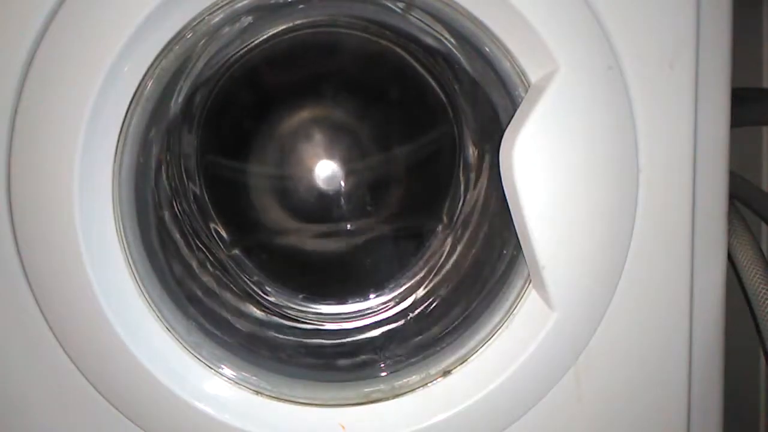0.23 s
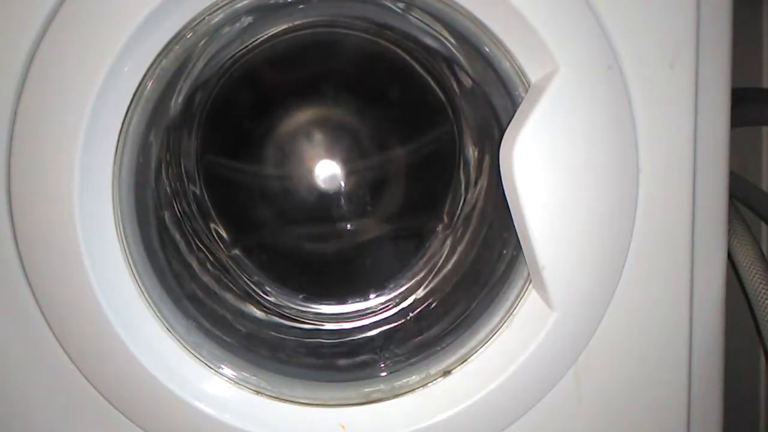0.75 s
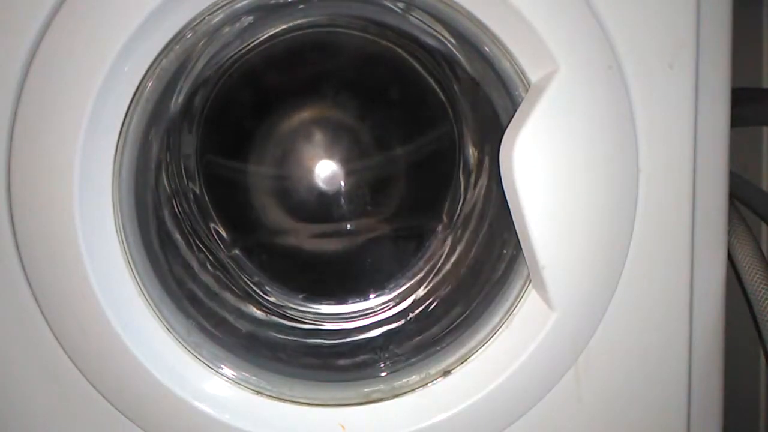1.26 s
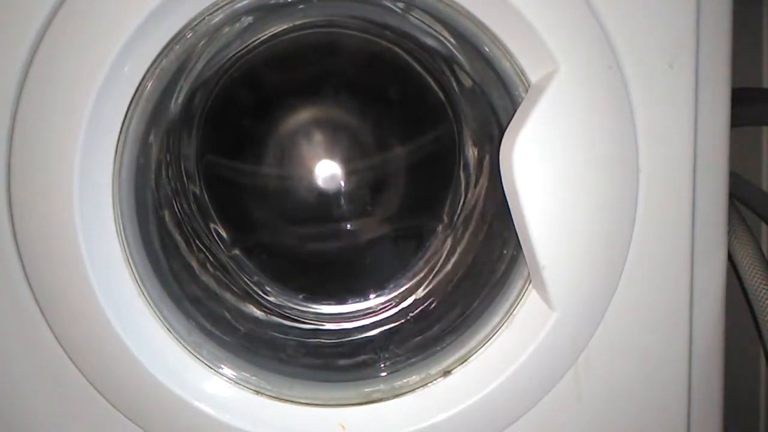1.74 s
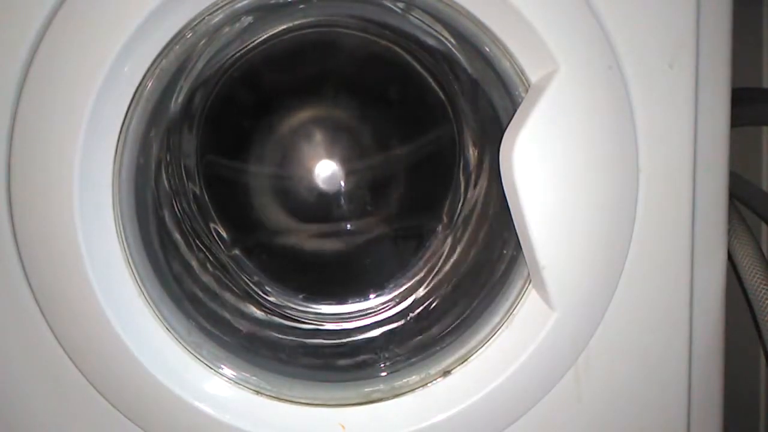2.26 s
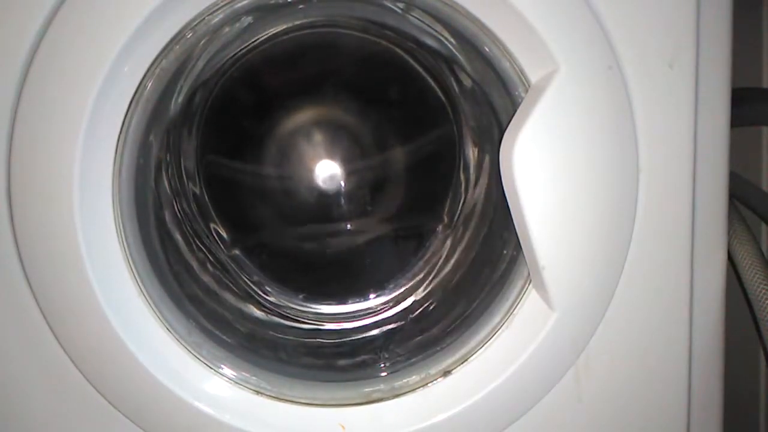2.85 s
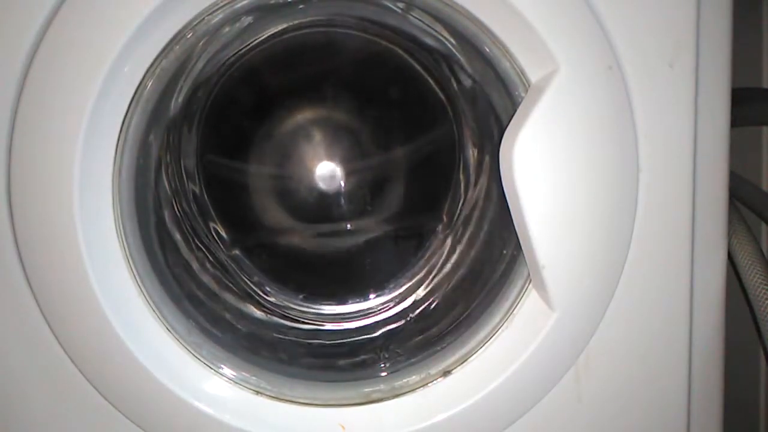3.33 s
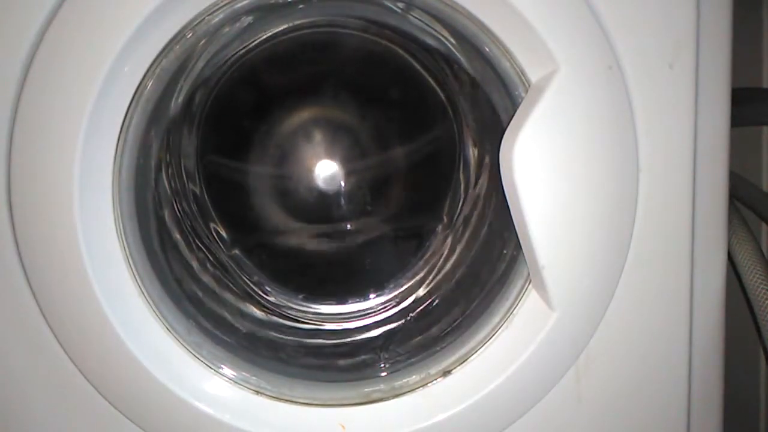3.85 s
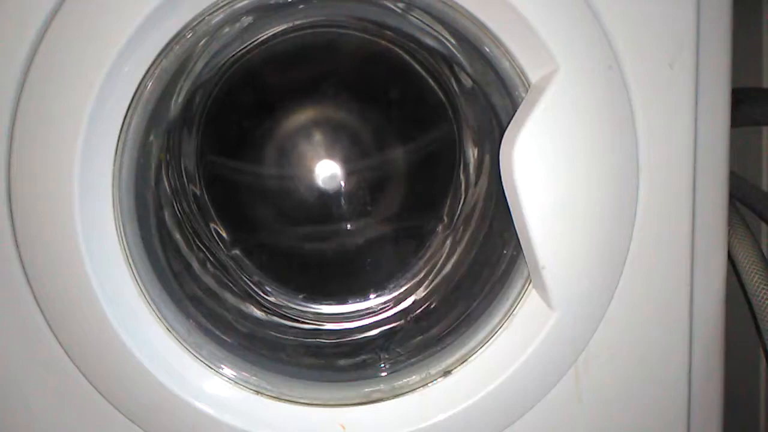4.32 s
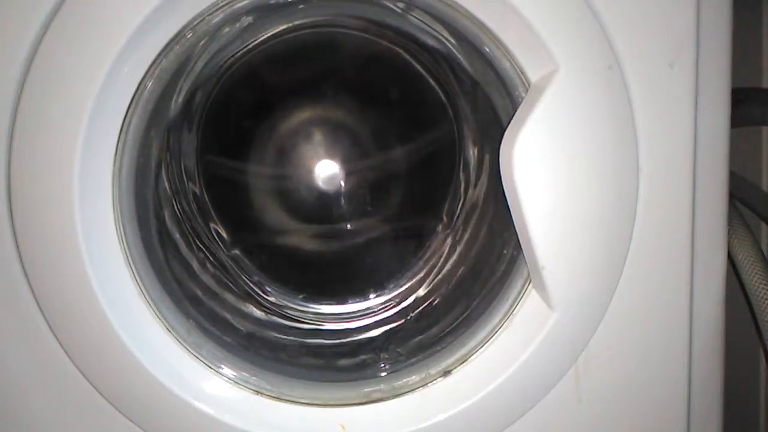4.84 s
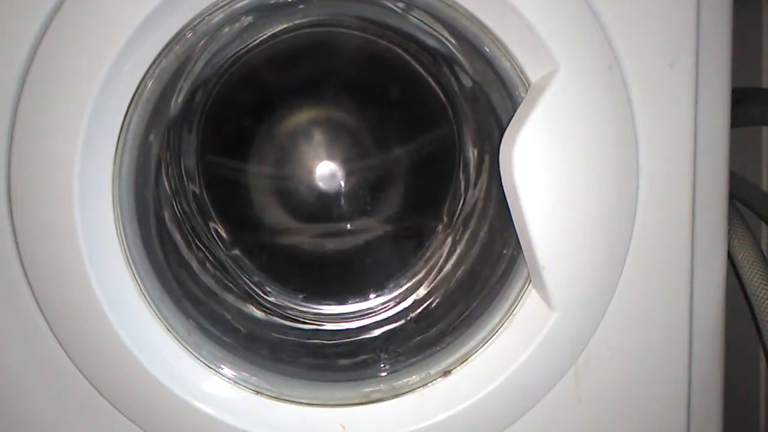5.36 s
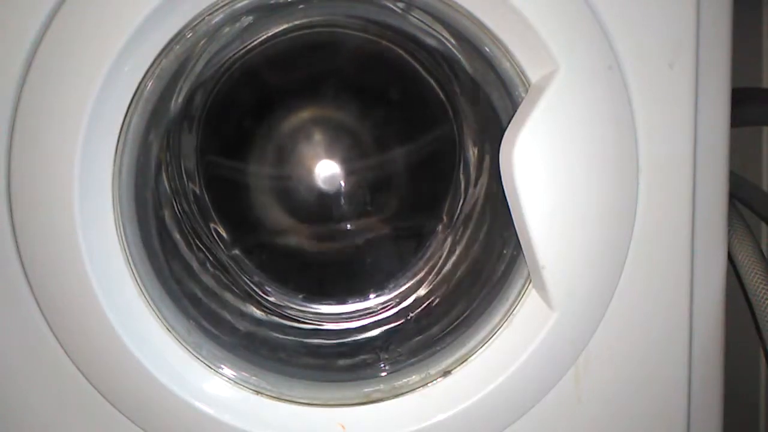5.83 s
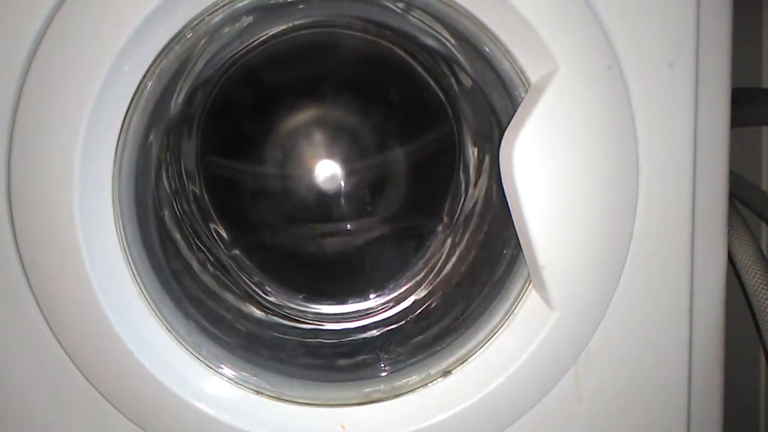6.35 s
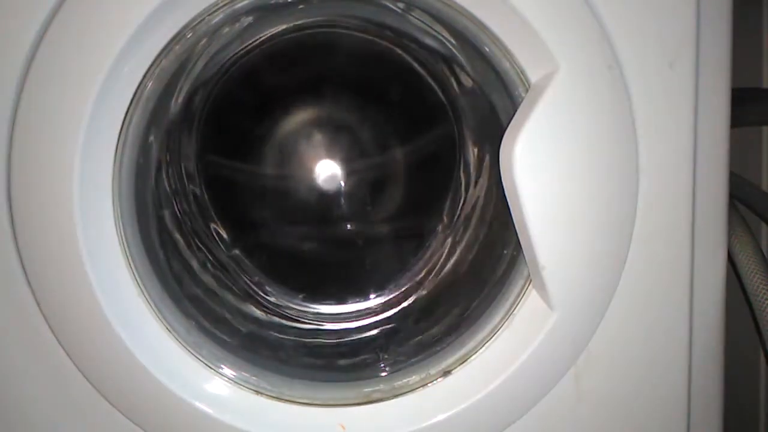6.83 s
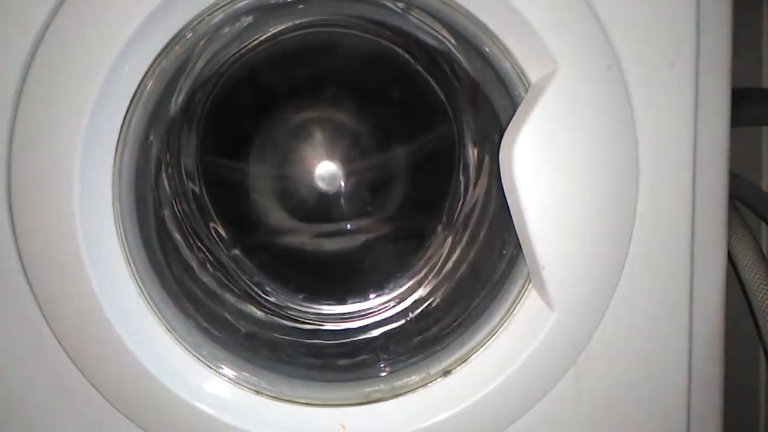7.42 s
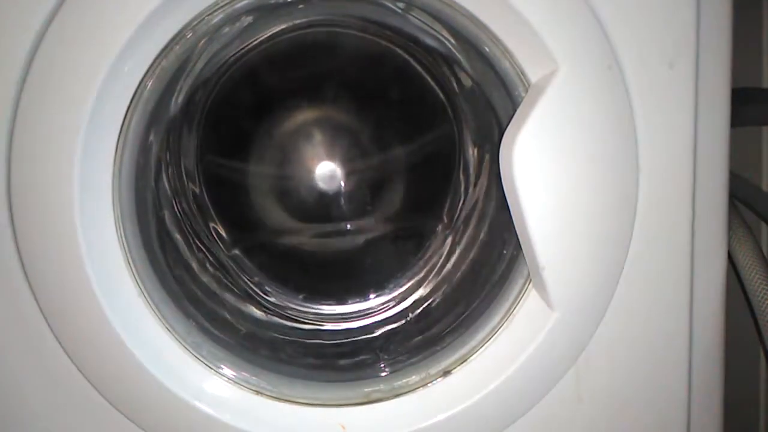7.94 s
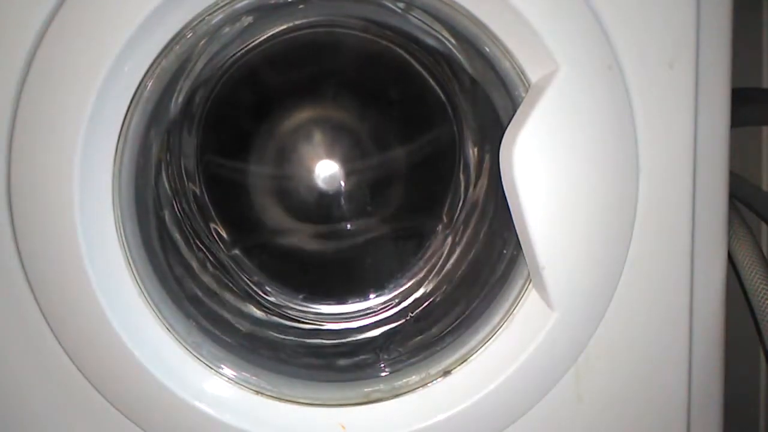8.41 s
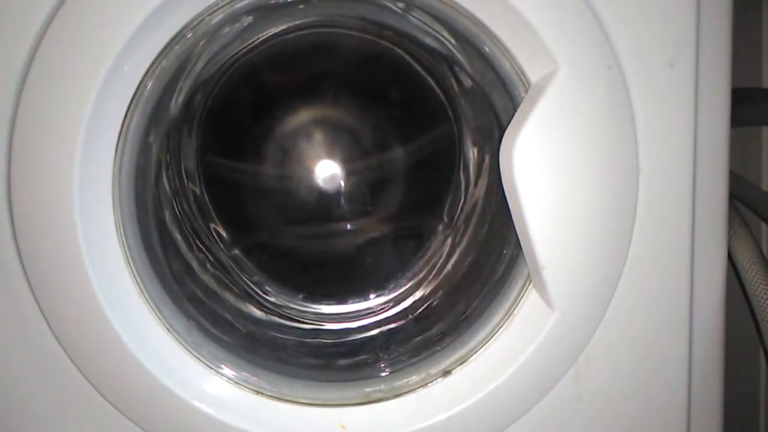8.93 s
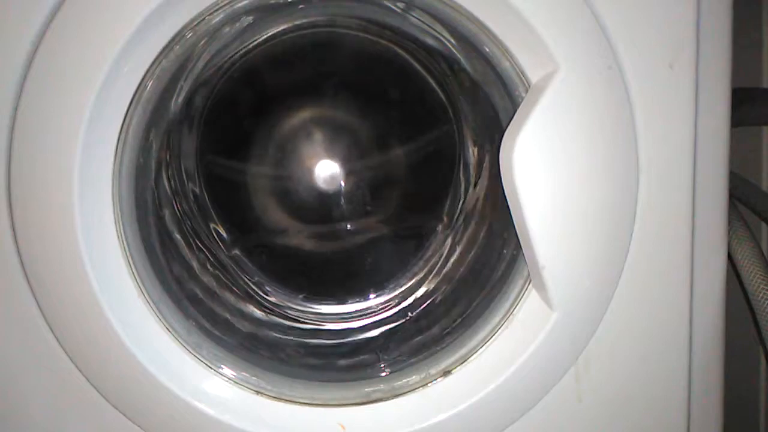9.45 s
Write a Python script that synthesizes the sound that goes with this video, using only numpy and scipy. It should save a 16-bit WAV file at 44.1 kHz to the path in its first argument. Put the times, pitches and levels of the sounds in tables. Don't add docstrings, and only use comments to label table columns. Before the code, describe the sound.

From 0 seconds a front-loading washing machine is already spinning at high, practically constant speed in a small room, heard close in stereo. Very deep sound dominates: the unbalanced drum throbs roughly sixteen times a second, and its sprung tub sways with irregular, muffled lurches, two or three each second, pressing the sound slightly. Over this lies a steady low motor hum near 185 hertz with mains buzz, hollow metal-panel rumble and a soft fan rush. Much fainter, a thin high whine and dry, sizzling brush hiss flutter with the drum. They chatter roughly from 0 to about 4 seconds, strongest around 2.4 and 3.6, then become firmer and smoother, weakest near 5.7, with hiss rising again by 8.4 and roughness returning towards the end. At about 8.9 seconds a small hard double tick touches the glass door, barely above the rumble. The spin continues to an abrupt end near 9.7 seconds.

```python
import sys
import numpy as np
from scipy import signal
from scipy.fft import rfft, irfft, next_fast_len
from scipy.io import wavfile
from scipy.ndimage import uniform_filter1d, minimum_filter1d, map_coordinates

SR = 44100
rng = np.random.default_rng(int(sys.argv[2]) if len(sys.argv) > 2 else 0)


def makeup_ratio(level_db):
    decades = np.asarray(level_db, float) / 20
    return 10 ** decades


def pcm_store(signal):
    levels = np.round(np.clip(np.atleast_2d(signal), -1, 1) * 32767)
    wavfile.write(sys.argv[1], SR, levels.astype(np.int16).T)


N = 426888
BELT_RATIO = 11.682


def unit(x):
    return x / np.sqrt(np.mean(x ** 2) + 1e-20)


def mid_unit(pair):
    return pair / np.std(pair.mean(0))


def along(points, hz):
    f, *columns = np.transpose(points)
    return np.array([np.interp(np.log(hz + 1), np.log(f + 1), column) for column in columns])


def curves(rows):
    s, *columns = np.transpose(rows)
    return np.array([np.interp(np.arange(N) / SR, s, column) for column in columns])


def wobble(rate):
    knots = rng.standard_normal(int(N * rate / SR) + 4)
    return unit(map_coordinates(knots, [np.arange(N) * rate / SR]))


def tone(angle, left_db, right_db, lead):
    angle = angle + rng.uniform(0, 2 * np.pi)
    s, c = np.sin(angle), np.cos(angle)
    left = makeup_ratio(left_db) * (s * np.cos(lead) + c * np.sin(lead))
    return np.sqrt(2) * np.array([left, makeup_ratio(right_db) * s])


# [t/s, turns per s]
SHAFT_SPEED = [(0, 185.285), (.4, 185.293), (1.3, 185.36), (2.3, 185.44), (2.8, 185.44), (3.3, 185.4),
               (4.3, 185.29), (5.8, 185.12), (6.3, 185.13), (8, 185.22), (9.68, 185.23)]
# [f/Hz, likeness 0-1]
LIKENESS = [(30, .999), (70, .985), (140, .99), (330, .95), (470, .7), (800, .6), (1000, .15), (1550, .35),
            (2200, .08), (14000, .04)]
# [f/Hz, left lead/rad]
LEFT_LEAD = [(30, 0), (150, 0), (255, .25), (335, .85), (420, 0), (630, .3), (800, .2), (1000, -2.2),
             (1550, -3.3), (1900, -4.5)]
# [f/Hz, width/Hz, left level/dB, right level/dB]
RESONANCES = [(68, 2.2, -2, -1), (76, 5, -12, -8.5), (243, 8.2, 4, 4.5), (337.5, 8.8, 2.5, 2.5),
              (422, 14.4, 3.5, 3.5), (491, 11.4, 4, 7.5), (602.5, 9, 8.5, 2), (653, 20, 3.5, 1.5),
              (808, 22, -3, 2), (870, 15, 0, 4), (920, 16, 6, 8.5), (1011, 11.4, 6, 6.5),
              (1160, 36, 0.5, 5.5), (1316, 9.1, -4, -10), (1395, 10, -6, -6), (1520, 13, -1, 7.5),
              (1666, 16, 9.5, 2.5), (1880, 16, 8, -2.5), (2645, 13, -2, 10), (3950, 35, 2, 6.5)]


def noise(colour, repeat=0.):
    m = next_fast_len(N)
    hz = np.fft.rfftfreq(m, 1 / SR)
    a, b = rfft(rng.standard_normal((2, m)))
    spread = np.arccos(np.clip(along(LIKENESS, hz)[0], -1, 1)) / 2
    left = (a * np.cos(spread) + b * np.sin(spread)) * np.exp(1j * along(LEFT_LEAD, hz)[0])
    right = a * np.cos(spread) - b * np.sin(spread)
    db = along(colour, hz)
    for centre, width, *lift in RESONANCES:
        near = slice(*np.searchsorted(hz, [centre - 4 * width, centre + 4 * width]))
        db[:, near] += np.outer(lift, np.exp(-((hz[near] - centre) / width) ** 2))
    repeat = np.clip(repeat * np.minimum(hz / 6000, 1) ** 3, 0, .6)
    turns_per_s = np.mean(SHAFT_SPEED, axis=0)[1]
    comb = np.sqrt(1 - repeat ** 2) / (1 - repeat * np.exp(-2j * np.pi * hz / turns_per_s))
    return irfft(np.array([left, right]) * makeup_ratio(db) * comb * np.sqrt(SR / 2), m)[:, :N]


# [t/s, level/dB]
BRUSH_CURRENT = [(0.0, -57.5), (0.24, -56), (0.86, -54.5), (0.94, -58.5), (1.08, -55.5), (2.05, -54.5),
                 (2.08, -57), (2.69, -55.5), (2.88, -60.5), (3.5, -56), (4.53, -57.5), (4.72, -54),
                 (5.72, -63.5), (6.61, -59.5), (8.38, -54), (9.33, -55), (9.6, -58), (9.68, -55)]


def driven(rules):
    fast_hz, fast_span_hz, flicker_db = 185.298, .013, .7
    current_db = curves(BRUSH_CURRENT)[0]
    swing_db = current_db - current_db.mean()
    fast = 1 / (1 + np.exp((fast_hz - curves(SHAFT_SPEED)[0]) / fast_span_hz))
    return [db + follows * swing_db + fast_db * fast + flicker_db * wobble(4)
            for db, follows, fast_db in rules]


# [f/Hz, left level/dB per Hz, right level/dB per Hz]
WALLS = [(29.8, -67, -76), (55, -42, -46.5), (88.6, -45.5, -42.5), (98, -51.5, -50.5), (155, -48.5, -46.5),
         (168, -54, -52.5), (230, -56, -54), (282, -53.5, -52.5), (309.5, -72, -55), (328.5, -51.5, -53),
         (348, -60, -57.5), (444, -62, -66.5), (501, -67, -70), (630, -100, -100)]
# [f/Hz, left level/dB per Hz, right level/dB per Hz]
PANEL_BOOM = [(406, -100, -100), (526, -73, -62.5), (590, -62.5, -70.5), (700, -68, -64), (789, -59, -64.5),
              (910, -74, -77.5), (960, -73, -71.5), (1130, -74, -71.5), (1370, -70, -72), (1485, -82, -79),
              (1790, -82.5, -85.5), (1990, -83.5, -79), (2130, -81, -85), (2280, -110, -110)]
# [f/Hz, left level/dB per Hz, right level/dB per Hz]
FAN_RUSH = [(1980, -111, -111), (2170, -89.5, -82.5), (2650, -85.5, -81.5), (3030, -89.4, -88),
            (3170, -87.5, -84.5), (3600, -88, -88.5), (4265, -88, -80.5), (4210, -94, -87),
            (5000, -94.5, -94.5), (5700, -94.5, -99), (6420, -96, -100.5), (6610, -89, -89),
            (7120, -99.5, -99.5), (8260, -131, -131)]
# [mean level/dB, dB per dB of current, extra level/dB at high speed]
FAN_DRIVE = [(0, .3, 0)]


def cabinet():
    walls = noise(WALLS)
    panels = makeup_ratio(0.34 * wobble(2.24)) * noise(PANEL_BOOM)
    fan = makeup_ratio(driven(FAN_DRIVE)[0] + .4 * wobble(8)) * noise(FAN_RUSH, repeat=0.4)
    return walls + panels + fan


# [t/s, peak level/dB, f/Hz]
DOOR_TAPS = [
    (8.887, -41, 4450),
    (8.893, -48, 5500),
    (8.915, -50, 4200),
]


def tick():
    out = np.zeros((2, N))
    t = np.arange(SR // 10) / SR
    for s, db, hz in DOOR_TAPS:
        rough = uniform_filter1d(rng.standard_normal((2, len(t))), size=70) * 8
        envelope = makeup_ratio(db - 60 * t / .15) * (1 - np.exp(-t / .002))
        out[:, round(s * SR):][:, :len(t)] += envelope * rough * np.sin(2 * np.pi * hz * t)
    return out


# [left level/dB, right level/dB, left lead/rad]
ROTOR_HUM = [
    (-20.5, -18, -0.21),
    (-47.5, -44.5, 0.3),
]
BUZZ_HZ = [100, 139.7, 200, 210.4, 300, 500, 550, 700, 750]
# [left level/dB, right level/dB, left lead/rad]
BUZZ = [(-37, -35, .2), (-39, -38, -.1), (-43, -41, .1), (-47, -45, -.1), (-51, -43, 0), (-54, -65, -.6),
        (-51, -58, -.4), (-53, -58, .6), (-53, -57, .7)]


def hum(shaft):
    t = np.arange(N) / SR
    rotor = sum(tone((k + 1) * shaft, *row) for k, row in enumerate(ROTOR_HUM))
    buzz = sum(tone(2 * np.pi * hz * t, *row) for hz, row in zip(BUZZ_HZ, BUZZ))
    return rotor * makeup_ratio(0.25 * wobble(6)) + buzz * makeup_ratio(0.47 * wobble(2.93))


# [multiple, left level/dB, right level/dB, left lead/rad]
SHAFT_ORDERS = [(3, -43, -50, 1.8), (13, -71, -74, -0.5), (14, -69, -60, -1.9), (18, -64, -56, -0.7),
                (19, -67, -70, 2.5), (21, -70, -68, -0.1), (23, -81, -61, -0.6), (24, -86, -73, 0.1),
                (29, -77, -85, -0.8), (31, -75, -79, -0.6), (32, -74, -83, -0.5), (33, -77, -83, 1.2),
                (34, -78, -86, -2.0), (35, -71, -80, 2.7), (36, -58, -61, -1.5), (39, -79, -79, -0.0),
                (41, -75, -78, 0.4), (49, -72, -59, 2.1), (53, -80, -73, 3.0), (54, -67, -57, 0.4),
                (55, -77, -79, -2.5), (59, -76, -77, 2.4), (60, -90, -69, -2.8), (61, -87, -71, 2.3),
                (62, -87, -72, 0.4), (67, -82, -73, 1.2), (69, -81, -68, 2.1), (71, -84, -75, -1.0),
                (72, -69, -59, -1.3), (73, -83, -73, 2.0)]
SLOT_ORDERS = [36, 49, 54, 72]
# [mean level/dB, dB per dB of current, extra level/dB at high speed]
SLOT_DRIVE = [
    (-65.5, 0.9, 0),
    (-67, 1.3, -4.5),
    (-65, 1.5, -0.5),
    (-76, 0, 13),
]
LOOSE_ORDERS = [14, 18, 54, 60]


def whine(shaft, chatter, hiss_db):
    turn = shaft / BELT_RATIO
    shaken = shaft + .011 * np.sin(turn)
    pressure = makeup_ratio(.5 * (uniform_filter1d(hiss_db, size=20000) - hiss_db.mean()))
    slot_db = dict(zip(SLOT_ORDERS, driven(SLOT_DRIVE)))
    out = np.zeros((2, N))
    for k, left_db, right_db, lead in SHAFT_ORDERS:
        loose = chatter if k in LOOSE_ORDERS else .12
        slip = 1.5 * loose * wobble(40)
        start = rng.normal(0, 1.6)
        throb = 1 + 0.37 * np.cos(turn + start) + 0.11 * np.cos(5 * turn + start)
        grip = throb * makeup_ratio((0.6 + 2.0 * loose) * wobble(26))
        pair = tone(k * shaken + slip, left_db, right_db, lead)
        if k in slot_db:
            out += grip * makeup_ratio(slot_db[k] + 4.0) * mid_unit(pair)
        else:
            out += grip * makeup_ratio(-0.14) * pressure * pair
    return out


def end_shield(turn, chatter, ring_db):
    # f/Hz, left level/dB, right level/dB
    shield = [(2900, -90, -92), (3270, -26.0, -17.0), (3380, -6.0, -3.5), (3430, -21.0, -16.0),
              (3800, -91, -90)]
    swell = makeup_ratio((4.5 + 3 * chatter) * np.cos(turn))
    return makeup_ratio(ring_db - 1.5) * mid_unit(noise(shield) * swell)


# [f/Hz, left level/dB per Hz, right level/dB per Hz]
HISS_COLOUR = [(6500, -69, -72), (7300, -11, -7.5), (8260, -3, 0.5), (8960, -9, -1.5), (10400, -5, 0),
               (10700, -24, -17), (11500, -75, -68)]
# [f/Hz, left level/dB per Hz, right level/dB per Hz]
SIZZLE_COLOUR = [(9000, -71, -77), (10000, -29, -16), (10800, -13, 6), (12300, -11, 1), (12600, -10.5, 3),
                 (13100, -19, 2), (13600, -21, 2), (14300, -19.2, -8), (16000, -76, -73)]


def sparks(shaft, hiss_db, sizzle_db):
    contact = makeup_ratio(0.93 * wobble(19) + 0.69 * np.cos(shaft / BELT_RATIO) + 0.51 * wobble(44))
    eccentric = 1 + 0.12 * np.sin(shaft) + .07 * np.sin(2 * shaft)
    hiss = makeup_ratio(hiss_db + 1.4) * mid_unit(noise(HISS_COLOUR, repeat=0.22))
    sizzle = makeup_ratio(sizzle_db + 1.0) * mid_unit(noise(SIZZLE_COLOUR, repeat=.22))
    return contact * eccentric * (hiss + sizzle)


# [t/s, chatter 0-1]
HOLDER_CHATTER = [
    (0, .8),
    (1.5, .6),
    (2.4, 1),
    (2.9, .6),
    (3.6, 1),
    (4.2, .3),
    (4.6, .1),
    (8.3, .12),
    (9.68, .6),
]
# [mean level/dB, dB per dB of current, extra level/dB at high speed]
BRUSH_DRIVE = [
    (-61.5, 1, -0.5),
    (-60.5, .7, 1),
    (-65.5, .6, 8),
]


def commutator(shaft):
    chatter = curves(HOLDER_CHATTER)[0]
    hiss_db, sizzle_db, ring_db = driven(BRUSH_DRIVE)
    ring = end_shield(shaft / BELT_RATIO, chatter, ring_db)
    return whine(shaft, chatter, hiss_db) + ring + sparks(shaft, hiss_db, sizzle_db)


# [t/s, peak level/dB, length/s]
TUB_LURCHES = [(.3, -12, 0.15), (0.654, -19, 0.035), (0.883, -22, 0.07), (1.157, -13.5, .1),
               (1.4, -18, .04), (1.718, -15, .15), (2.167, -11, 0.06), (2.352, -13, 0.044),
               (2.68, -17, .14), (3.1, -18.5, 0.28), (3.88, -16.5, 0.15), (4.218, -15, .06),
               (4.544, -15, 0.059), (4.8, -14, .04), (5.204, -12, 0.07), (5.75, -17, .15),
               (6.17, -14, 0.22), (6.71, -16, 0.075), (6.99, -16, .07), (7.254, -15, 0.058),
               (7.436, -15, .04), (7.63, -11.5, 0.055), (8.05, -20, 0.21), (8.42, -18, 0.089),
               (8.82, -13, .06), (9.02, -19.5, 0.17), (9.43, -15, 0.12)]


def lurches():
    t = np.arange(0, N + 64, 64) / SR
    power = makeup_ratio(-26.5) ** 2
    for s, db, length in TUB_LURCHES:
        power = power + makeup_ratio(db) ** 2 * np.exp(-((t - s) / length) ** 2)
    return np.interp(np.arange(N) / SR, t, np.sqrt(power))


BEAT_ORDERS = [1, 4, 5, 8, 12, 45, 49, 84, 150, 168, 169, 237, 241.5]
# [left level/dB, right level/dB, left lead/rad]
BEATS = [(-12.2, -11.4, -.04), (-39.5, -39, 0), (-39, -38.1, 0), (-43, -42.1, 0), (-45, -43, -.3),
         (-53, -52, .1), (-48, -55, -.6), (-57, -57, 1.1), (-75, -76, 0), (-68, -64, -2.8), (-71, -71, 1.8),
         (-73, -76, 1), (-72, -74, 2)]
# [f/Hz, left level/dB per Hz, right level/dB per Hz]
TUB_SWAY = [(2, -18.8, -18), (6, -15.8, -15), (11, -13, -12.2), (18, -10.8, -10), (21, -8.7, -8),
            (24, -3.7, -3), (27, -.7, 0), (32, -1.7, -1), (36, -3.7, -3), (40, -9, -8.3), (45, -15, -14.2),
            (50, -20, -19), (56, -31, -30), (90, -160, -160)]


def drum(shaft):
    turn = shaft / BELT_RATIO
    beats = sum(tone(k * turn, *row) for k, row in zip(BEAT_ORDERS, BEATS))
    sway = noise(TUB_SWAY)
    swell = np.sqrt(np.abs(uniform_filter1d(sway.mean(0) ** 2, size=5000)))
    damped = sway / (swell / np.mean(swell) + .2) ** .8
    return beats + makeup_ratio(1.6) * lurches() * mid_unit(damped)


def scene():
    shaft = 2 * np.pi * np.cumsum(curves(SHAFT_SPEED)[0]) / SR
    return cabinet() + tick() + hum(shaft) + commutator(shaft) + drum(shaft)


def top_cut(x):
    return signal.sosfilt(signal.butter(12, 14280, fs=SR, output="sos"), x)


def record(dry):
    ceiling = .81
    need = np.minimum(1, ceiling / (np.abs(dry).max(0) + 1e-9))
    gain = uniform_filter1d(minimum_filter1d(need, size=1400), size=1100)
    t = np.arange(N) / SR
    fade = np.clip(np.minimum(t / .004, (t[-1] - t) / .003), 0, 1)
    edges = np.sin(np.pi / 2 * fade) ** 2
    return top_cut(dry * gain * edges)


dry = scene()
out = record(dry)
pcm_store(out)
```